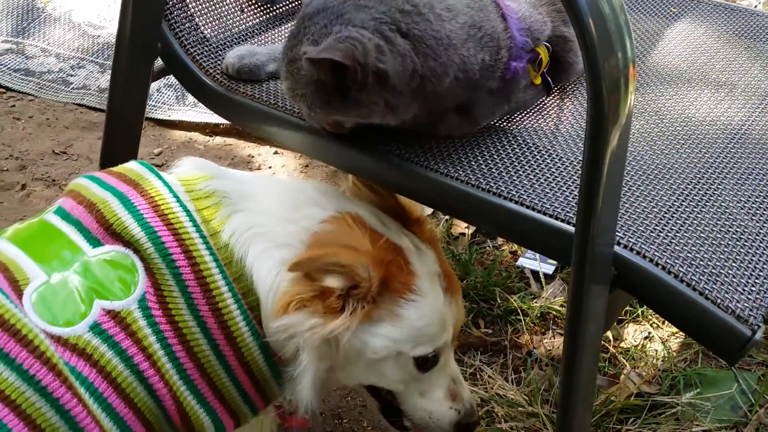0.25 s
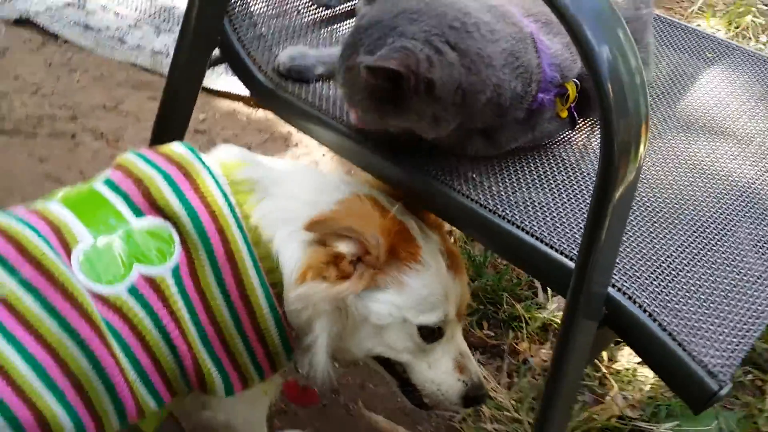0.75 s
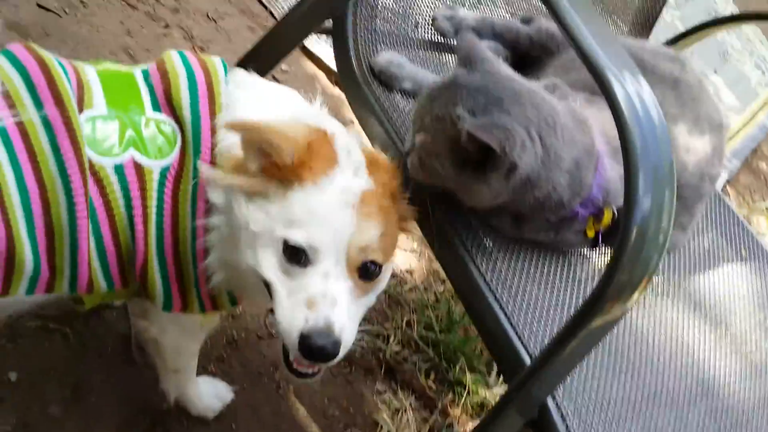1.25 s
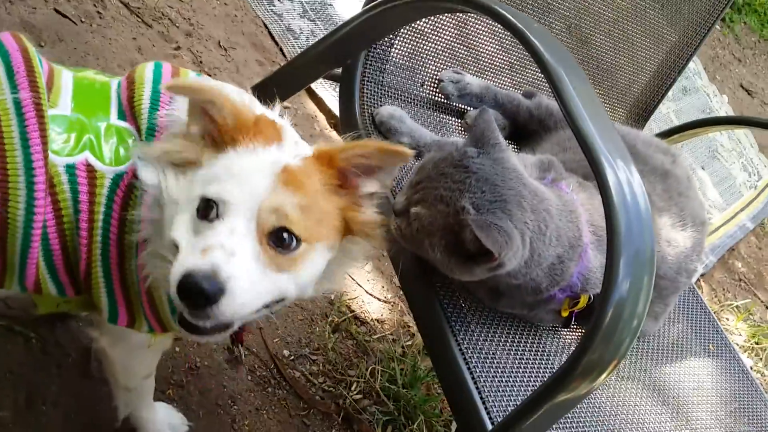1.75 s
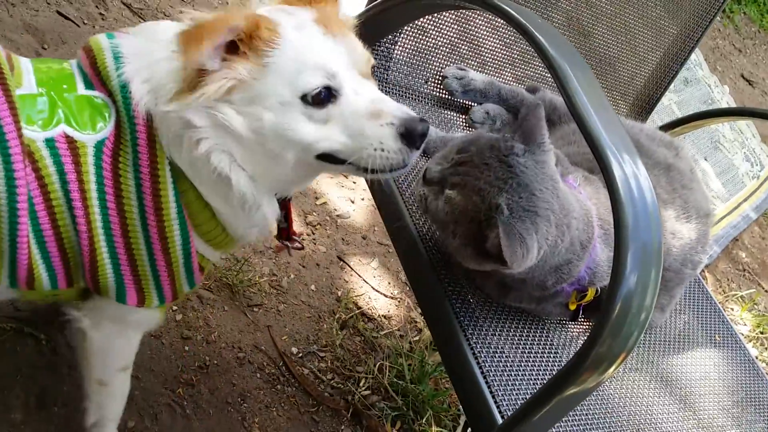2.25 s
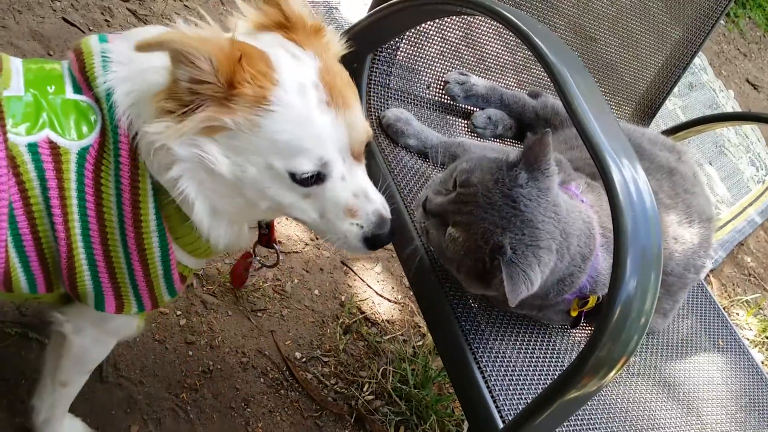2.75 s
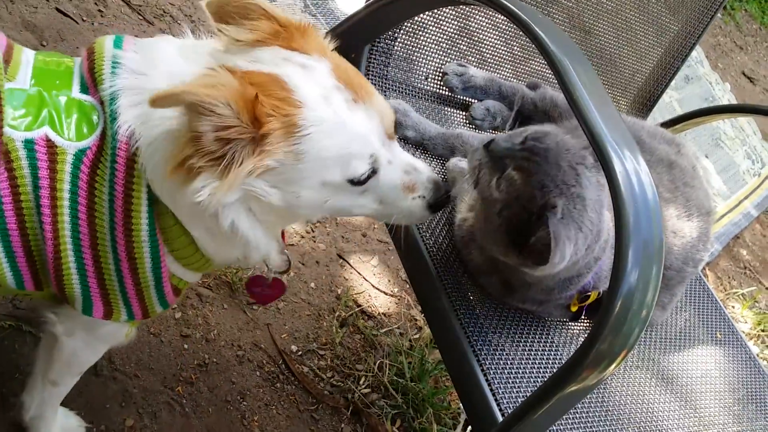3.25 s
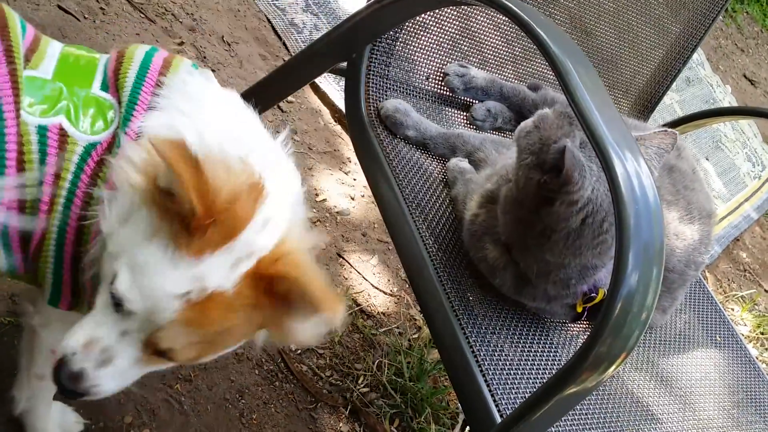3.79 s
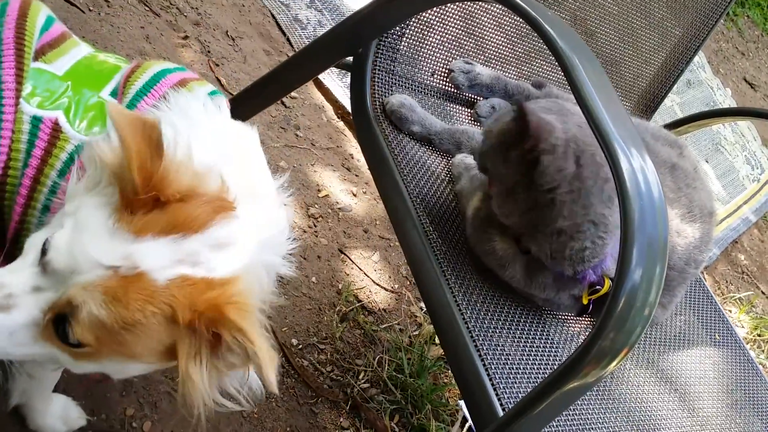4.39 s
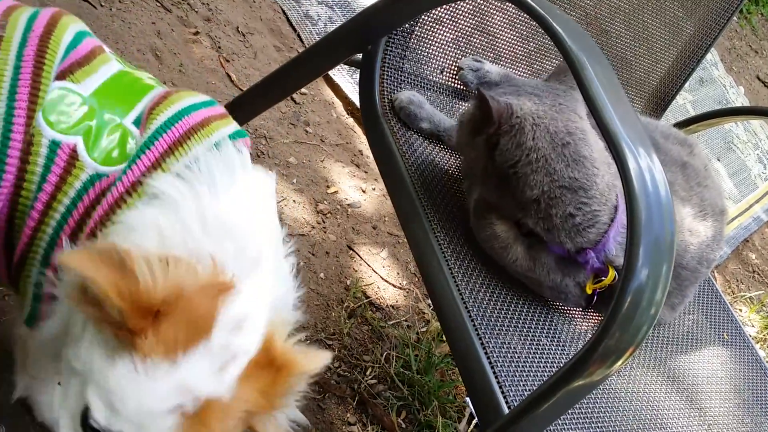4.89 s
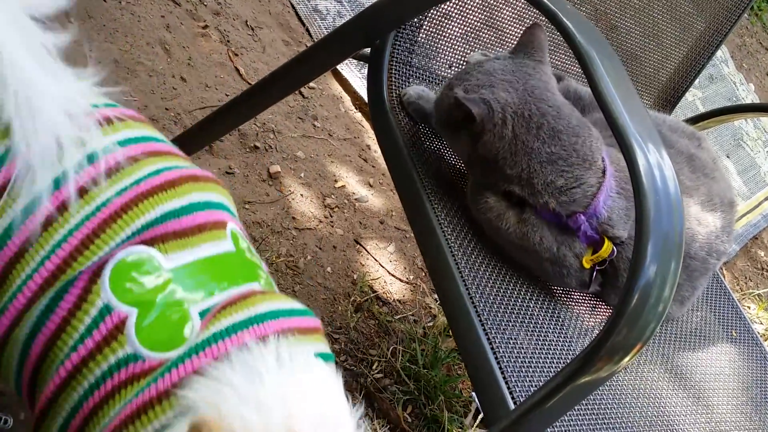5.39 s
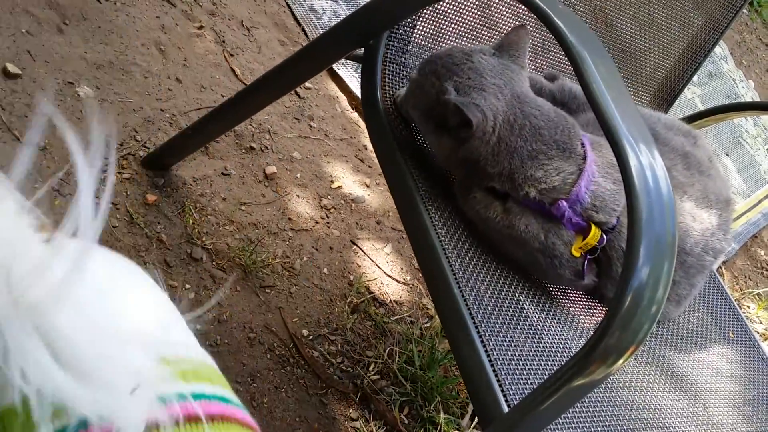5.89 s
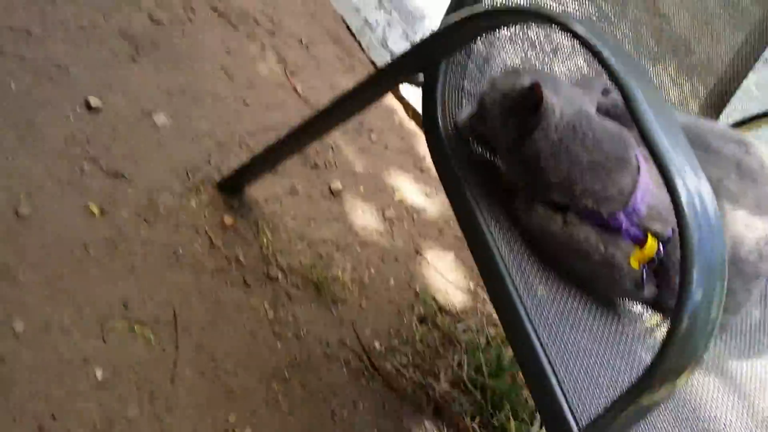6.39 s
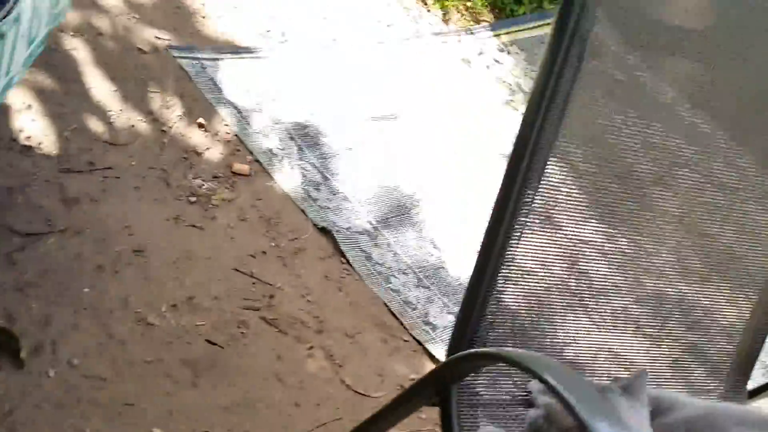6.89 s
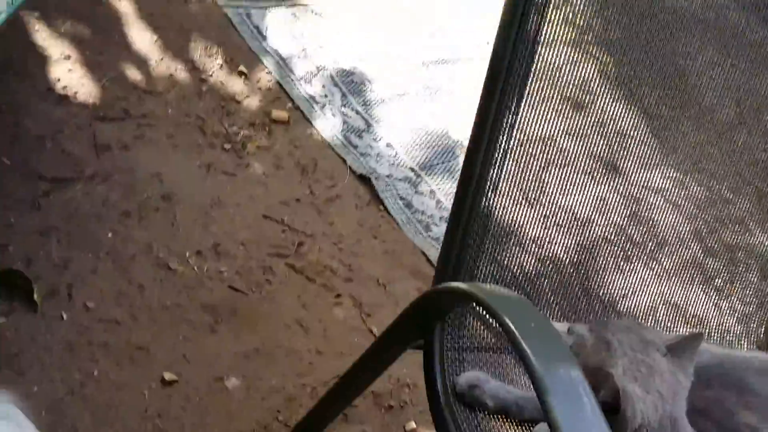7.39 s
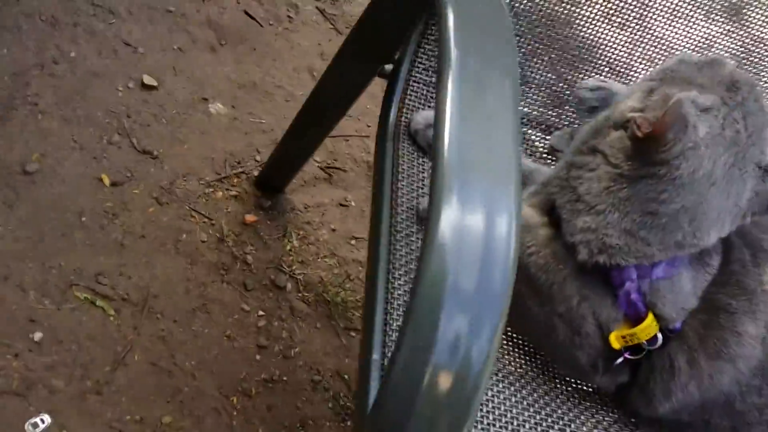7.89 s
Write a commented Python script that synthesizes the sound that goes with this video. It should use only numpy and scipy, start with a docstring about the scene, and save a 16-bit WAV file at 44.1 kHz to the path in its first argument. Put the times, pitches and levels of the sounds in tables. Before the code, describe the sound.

Close on the right, a dog's tags tick and jingle with gritty paw steps and coat rustle, over distant traffic wash and hiss.

```python
"""Metal collar tags clink, chatter and damp each other as a small dog moves about on dry soil, close on the right.
Each contact excites decaying tag modes, short clasp resonances and clicks; a few weak echoes follow.
Clumped noise grains make the paws and the rustling coat, and sharp clicks make snapping grit and twigs.
A far engine hums as gliding sines for about five seconds, over a slowly swelling wash of traffic in
shaped noise, a faint early whistle and a steady hiss."""
import sys
import numpy as np
from scipy import signal
from scipy.fft import rfft, irfft, next_fast_len
from scipy.io import wavfile

SR = 44100
rng = np.random.default_rng(int(sys.argv[2]) if len(sys.argv) > 2 else 0)


def persist_wave(psi):
    """Save psi, clipped to +-1, as 16-bit WAV."""
    counts = np.round(np.clip(psi, -1, 1) * 32767).astype(np.int16)
    wavfile.write(sys.argv[1], SR, np.atleast_2d(counts).T)


N = 359106
TIME = np.arange(N) / SR

# Contacts between the tags. Each row: start in seconds, relative strength in dB of the tag's first, second
# and third mode family, ring time in seconds to fall 60 dB, relative clack of the link ring in dB.
CLINKS = [(1.098, -30, -32, -43, 0.05, -34), (1.103, -52, -41, -62, 0.04, -40),
          (1.141, -41, -22, -48, 0.08, -35), (1.158, -31, -38, -40, 0.14, -46),
          (1.175, -28, -26.5, -42, 0.096, -33), (1.204, -52, -49, -63, 0.34, -62),
          (2.138, -51, -44, -33, 0.054, -36), (2.158, -57, -50.5, -63, 0.37, -55),
          (2.227, -45, -18, -27, 0.078, -32.5), (2.261, -51, -49, -48, 0.23, -39),
          (2.412, -53, -49, -60, 0.1, -44), (2.418, -45, -41.5, -54, 0.1, -50),
          (2.873, -59, -51, -72, 0.12, -61), (3.733, -52, -47, -42, 0.1, -51),
          (3.742, -35, -37, -35, 0.1, -44), (3.749, -42, -45, -48, 0.17, -39),
          (3.782, -40, -44, -46, 0.23, -38), (3.796, -42, -39, -50, 0.17, -35),
          (3.8232, -34, -22.5, -34, 0.14, -29), (3.837, -51, -30, -52, 0.044, -50),
          (4.021, -56.5, -62, -56, 0.28, -43), (4.102, -52, -66, -58, 0.18, -43.5),
          (4.491, -51, -60, -59, 0.3, -43), (4.545, -49, -64, -49, 0.2, -46),
          (4.556, -54, -52, -52, 0.12, -57), (5.438, -35.5, -45, -43, 0.12, -39),
          (5.592, -38, -56, -44, 0.1, -38), (5.638, -43, -64, -58, 0.07, -55),
          (6.182, -34.5, -40, -42, 0.091, -29), (6.24, -36, -62, -53, 0.19, -24),
          (6.263, -47, -49, -52, 0.11, -31), (6.298, -25, -28, -26, 0.1, -17),
          (6.305, -32, -40, -23, 0.25, -22), (6.316, -20, -34, -21, 0.1, -29),
          (6.326, -15, -39, -32, 0.1, -29), (6.333, -22, -33, -26, 0.11, -29),
          (6.363, -24, -13, -26, 0.1, -18), (6.372, -16, -17.5, -32, 0.083, -25),
          (6.385, -19, -22, -43, 0.25, -31), (6.397, -13.5, -20, -38, 0.11, -34),
          (6.407, -25, -27, -38, 0.1, -25), (6.415, -44, -44, -48, 0.1, -38),
          (6.424, -29, -26, -38, 0.08, -26), (6.432, -29, -36, -46, 0.16, -33),
          (6.447, -44, -36, -51, 0.2, -51), (6.536, -10.5, -22, -47, 0.1, -18),
          (6.5405, -14, -19, -48, 0.083, -26), (6.558, -6, -23, -29, 0.2, -19),
          (6.5655, -7, -30, -23, 0.1, -30), (6.568, -39, -47, -47, 0.2, -39),
          (6.588, -26, -54, -45, 0.25, -37), (6.606, -23, -41, -38, 0.11, -36),
          (6.6205, -27, -41, -42, 0.17, -21), (6.638, -23, -46, -37, 0.15, -34),
          (6.647, -16.5, -31, -31, 0.1, -28), (6.6655, -18, -27, -31, 0.1, -21),
          (6.671, -17.5, -32, -25.5, 0.1, -32), (6.714, -32, -48, -68, 0.06, -34),
          (6.78, -30, -46, -35, 0.08, -31), (6.794, -30, -39, -39, 0.1, -33),
          (6.803, -42, -52, -58, 0.2, -28), (6.869, -40, -63, -63, 0.13, -35),
          (6.952, -28.5, -52, -48, 0.18, -30), (6.966, -16.5, -33, -30, 0.1, -24),
          (6.992, -41, -42, -49, 0.15, -37), (7.042, -22.5, -37, -33, 0.2, -26),
          (7.058, -31, -45, -41, 0.1, -21), (7.065, -33, -55, -50, 0.09, -35),
          (7.107, -28, -50, -47, 0.1, -30), (7.113, -50, -51, -38, 0.077, -27),
          (7.144, -47, -41, -38, 0.062, -27), (7.423, -33, -50, -35, 0.14, -27),
          (7.444, -20, -28, -33, 0.1, -26), (7.45, -24, -28, -34, 0.1, -27),
          (7.461, -40, -35, -34, 0.081, -39), (7.532, -45, -48, -48, 0.05, -24),
          (7.543, -41, -49, -37, 0.085, -27), (7.572, -38, -45, -54, 0.1, -40),
          (7.673, -45, -57, -39, 0.1, -32), (7.684, -58, -44, -29, 0.05, -37),
          (7.695, -41, -36, -48, 0.095, -27), (7.85, -64, -42, -58, 0.32, -49),
          (7.933, -62, -49, -36, 0.05, -32), (8.064, -42, -53, -46, 0.13, -34)]


def from_db(db):
    """Decibels to amplitude gain."""
    return 10 ** (np.asarray(db) / 20)


def rms_one(x):
    """Scale to rms 1."""
    return x / np.sqrt(np.mean(x ** 2) + 1e-20)


def in_time(rows):
    """Draw each column of a breakpoint curve at every sample."""
    s, *columns = np.transpose(rows)
    return [np.interp(TIME, s, c) for c in columns]


def at_hz(points, hz):
    """Read a curve on a log-frequency axis."""
    point_hz, values = np.array(points).T
    return np.interp(np.log(hz), np.log(point_hz), values)


def drift(rate_hz):
    """Slow random wander with rms 1: low-passed noise, drawn at one point per 40 samples."""
    step = 40
    r = np.exp(-2 * np.pi * rate_hz * step / SR)
    noise = rng.standard_normal(N // step + 2002)
    slow = signal.lfilter([1], [1, -2 * r, r * r], noise)[2000:]  # skip the filter's settling
    return np.interp(np.arange(N) / step, np.arange(len(slow)), rms_one(slow))


def coloured(x, spectrum):
    """Filter a signal through a smooth spectral curve and scale it to rms 1."""
    size = next_fast_len(N)
    hz = np.maximum(np.fft.rfftfreq(size, 1 / SR), 1)
    shaped = rfft(x, size) * from_db(at_hz(spectrum, hz))
    return rms_one(irfft(shaped, size)[..., :N])


def air_noise(spectrum):
    """Far sound at two microphones: alike in the bass, less related and more one-sided in the treble."""
    # Each row: frequency in Hz, left minus right level in dB.
    air_balance = [(60, -3.5), (400, -5), (700, -5), (1290, -10.5), (2380, -21), (4400, -16.5),
                   (9000, -13.5)]
    # Each row: frequency in Hz, left-right correlation from 0 to 1.
    air_likeness = [(60, 0.9), (130, 0.94), (290, 0.95), (640, 0.68), (1400, 0), (3100, 0.38), (7000, 0)]
    size = next_fast_len(N)
    hz = np.maximum(np.fft.rfftfreq(size, 1 / SR), 1)
    mid, side = rfft(rng.standard_normal((2, size)))
    alike = np.clip(at_hz(air_likeness, hz), -1, 1)
    signs = np.array([[1], [-1]])  # left, right
    pair = np.sqrt(1 + alike) * mid + np.sqrt(1 - alike) * side * signs
    gain = from_db(at_hz(spectrum, hz) + signs * at_hz(air_balance, hz) / 2)
    return rms_one(irfft(pair * gain, size)[:, :N])


def grains(per_s, spread_db):
    """Random clicks of uneven size and either sign, independent in two channels, rms 1."""
    loudness_db = spread_db * np.minimum(rng.exponential(1, (2, N)), 4)
    sizes = from_db(loudness_db) * rng.choice([-1, 1], (2, N))
    return rms_one(sizes * (rng.random((2, N)) < per_s / SR))


def swells(rows):
    """Sum of bell-shaped rises and falls, one for each stroke."""
    bells = 0
    for s, spread_s, db in rows:
        bells = bells + from_db(db) * np.exp(-.5 * np.minimum(((TIME - s) / spread_s) ** 2, 100))
    return bells


def resonance(x, hz, width_hz):
    """Two-pole resonance with gain 1 at its peak."""
    r = np.exp(-np.pi * width_hz / SR)
    top = np.array([1, 0, -1]) * (1 - r * r) / 2
    return signal.lfilter(top, [1, -2 * r * np.cos(2 * np.pi * hz / SR), r * r], x + 1e-18)


def near(x, left_db):
    """Place a near source: the right channel is unchanged and the left is offset in level."""
    return x * from_db([[left_db], [0]])


def tag_ring(detune_hz=10, damp_s=0.00034, attack_s=0.00081, nudge_rad=1.0,
             free_db=-29, free_t60=0.18, waver_db=2.5):
    """Each contact sets the tag's modes ringing until the next stops them; a faint free ring lasts longer."""
    # The three mode families, each with its weaker companions. Each row: frequency in Hz, relative level in dB.
    tag_modes = [
        [(7252, -1.74), (7250, -28), (7420, -17), (7940, -27)],
        [(9812, 0), (10221, -22), (10434, -17)],
        [(11705, -0.5), (14100, -24)],
    ]
    out, t = np.zeros(N + SR), np.arange(SR // 3) / SR
    starts = [row[0] for row in CLINKS]
    for (s, *strengths_db, t60, _), until in zip(CLINKS, starts[1:] + [TIME[-1]]):
        stopped = np.exp(-np.maximum(t - (until - s), 0) / damp_s)
        held_ring = from_db(-60 * t / t60) * stopped
        free_ring = from_db(free_db - 60 * t / free_t60)
        fade = (1 - np.exp(-t / attack_s)) * (held_ring + free_ring)
        at = round(s * SR)
        for strength_db, family in zip(strengths_db, tag_modes):
            for hz, db in family:
                # a blow only nudges the phase of a mode that already swings; its load shifts the pitch a little
                off, kick = rng.standard_normal(2)
                cycles = hz * (t + at / SR) + detune_hz * off * t
                swing = np.sin(2 * np.pi * cycles + nudge_rad * kick)
                out[at:at + len(t)] += from_db(strength_db + db) * fade * swing
    return out[:N] * from_db(waver_db * drift(51))


def pings(notes, attack_s=0.00079):
    """Pure, dying notes of struck metal that ring on through later contacts."""
    out, t = np.zeros(N + SR), np.arange(SR // 2) / SR
    for s, hz, db, t60 in notes:
        at = round(s * SR)
        fade = from_db(db - 60 * t / t60) * (1 - np.exp(-t / attack_s))
        out[at:at + len(t)] += fade * np.sin(2 * np.pi * hz * t)
    return out[:N]


def clasp_clack(ringing, level_db=21, knock_db=-4, chatter_db=-7.5, chatter_per_s=3200, chatter_s=0.0043,
                closing_s=0.00074, buzz_db=-22, buzz_clump_db=3.5, buzz_s=0.036, colour_db=3.0, radiate_hz=6400):
    """Each contact knocks the link ring, which skids and rebounds in tiny clicks and buzzes on the ringing tag."""
    # Short resonances of link ring and clasp. Each row: frequency in Hz, width in Hz, relative level in dB.
    clasp = [(4330, 570, 5.5), (7430, 110, -1), (7340, 290, 6), (8030, 200, 5.5), (8510, 260, 10.5),
             (8860, 800, 3), (10280, 240, 4.5), (10470, 450, 1.5), (11200, 1000, -7), (14100, 1000, -13)]
    knocks = np.zeros(N)
    for s, *_, clack_db in CLINKS:
        knocks[round(s * SR)] = from_db(clack_db)
    skid = signal.lfilter([1], [1, -np.exp(-1 / (chatter_s * SR))], knocks + 1e-18)
    closing = np.exp(-1 / (closing_s * SR))  # the parts graze before they meet fully
    skid = signal.lfilter([1 - closing], [1, -closing], skid)

    keep = np.exp(-1 / (buzz_s * SR))  # the buzz follows the loudness of the tag
    loudness = signal.lfilter([1 - keep], [1, -keep], np.abs(ringing) + 1e-18)
    buzz = loudness * from_db(buzz_db + buzz_clump_db * drift(70))

    touches = (rng.random(N) < chatter_per_s / SR) * rng.uniform(0.76, 1, N) * rng.choice([-1, 1], N)
    clicks = from_db(knock_db) * knocks + (from_db(chatter_db) * skid + buzz) * touches
    rings = 0
    for k, (hz, width_hz, db) in enumerate(clasp):
        # the point of contact moves, so every blow favours other resonances
        favoured = clicks * from_db(db + colour_db * drift(42))
        rings = rings + (-1) ** k * resonance(favoured, hz, width_hz)
    # so small a part radiates almost nothing at longer wavelengths
    radiation = signal.butter(3, radiate_hz, "high", fs=SR, output="sos")
    return from_db(level_db) * signal.sosfilt(radiation, rings)


def clasp_snaps():
    """The clasp takes up its slack in very short, broad bursts of grating, dry and without a note."""
    # Each row: start in seconds, relative level in dB, decay constant in seconds.
    snaps = [(1.1, -39, .003), (1.14, -35, .003), (1.176, -32, .003), (3.745, -39, .008),
             (3.783, -41, .004), (4.332, -44, .001), (5.241, -46, .001), (6.536, -26, .0008),
             (7.058, -23.5, .003), (7.108, -26, .002), (7.449, -24, .003), (7.533, -22.5, .0009),
             (7.573, -34, .006), (7.614, -28, .0008), (7.734, -31, .0008), (7.756, -34, .0008)]
    # Each row: frequency in Hz, relative level in dB.
    snap_colour = [(2500, -29), (4800, -4), (6200, -3), (8700, 6.5), (14500, -3)]
    bursts, t = np.zeros(N + SR), np.arange(SR // 10) / SR
    for s, db, decay_s in snaps:
        at = round(s * SR)
        bursts[at:at + len(t)] += from_db(db) * np.exp(-t / decay_s)
    return bursts[:N] * coloured(rng.standard_normal(N), snap_colour)


def contact_clicks(level_db=-2, rebound_db=-1, rebound_s=0.0012, low_hz=2300):
    """Metal meeting metal: a bare, crisp click and one quick rebound."""
    clicks = np.zeros(N)
    for (s, *_, clack_db), late in zip(CLINKS, rng.uniform(0.48, 1.4, len(CLINKS))):
        clicks[round(s * SR)] += from_db(clack_db)
        clicks[round((s + late * rebound_s) * SR)] += from_db(clack_db + rebound_db)
    band = signal.butter(2, [low_hz, 13500], "band", fs=SR, output="sos")
    return from_db(level_db) * signal.sosfilt(band, clicks + 1e-18)


def garden_echoes(x, last_s=0.014, count=24):
    """A few weak reflections off the ground and a chair, with other delays on each side."""
    out = np.zeros((2, N))
    for k, delay in enumerate(rng.uniform(0.01, last_s, count)):
        lag = max(round(delay * SR), 1)
        out[k % 2, lag:] += x[:-lag] * np.exp(-2 * delay / last_s) * (-1) ** (k // 2)
    return out / 2


def collar(echo_db=-29):
    """The tags, link ring and clasp, close on the right, with their echoes on both sides."""
    # Blows that flex a tag and sound its lower notes. Each row: start in seconds, note in Hz,
    # relative level in dB, time in seconds to fall 60 dB.
    bends = [(1.158, 4110, -54, .06), (1.175, 3700, -55, .06), (1.178, 4425, -53, .25),
             (1.975, 3970, -49, .04), (5.585, 4150, -51, .1), (3.785, 4090, -47, 0.14),
             (3.82, 4080, -41, 0.054), (6.302, 4140, -28.5, 0.08), (6.363, 4100, -24, 0.062),
             (6.364, 4425, -36, 0.24), (6.425, 4370, -45, 0.59), (6.536, 4470, -39, .15),
             (6.558, 4380, -37, .12), (6.59, 4200, -37, 0.23), (6.965, 4080, -33, .07),
             (6.967, 4425, -45, .25), (7.044, 4110, -37, 0.076), (7.445, 4425, -43, .06)]
    # Blows that catch the link ring free; its note depends on where it is held. Each row: start in seconds,
    # note in Hz, relative level in dB, time in seconds to fall 60 dB.
    ring_notes = [(1.099, 10250, -33, .04), (1.175, 10206, -34, .03), (6.183, 10540, -33, 0.032),
                  (6.2975, 7520, -9, .02), (6.298, 8100, -8, .02), (6.315, 7988, -24, .06),
                  (6.408, 7700, -13, 0.027), (6.424, 7600, -17, .035), (6.425, 10220, -25, .04),
                  (6.5655, 7500, -11, 0.022), (6.62, 8074, -17, .025), (6.666, 7800, -10, .022),
                  (6.674, 8240, -19, 0.034), (7.042, 10422, -23.5, .06), (7.107, 10600, -31, .05),
                  (7.144, 8900, -30, .03), (7.532, 8613, -18, 0.018), (7.695, 10766, -23, 0.038)]
    ringing = tag_ring()
    metal = ringing + pings(bends) + pings(ring_notes)
    metal = metal + clasp_clack(ringing) + clasp_snaps() + contact_clicks()
    echoes = from_db(echo_db) * garden_echoes(metal) * from_db([[-1], [1]])
    return near(metal, left_db=-32.0) + echoes


def paws(level_db=-2.5, clump_db=0.5, grit_db=-4):
    """Soil crunches in coarse, clumped grains under each scuff, and a few larger crumbs grind among them."""
    # Each row: middle in seconds, spread in seconds, relative level in dB.
    scuffs = [(5.31, 0.025, -39.5), (5.61, 0.027, -46), (6.09, 0.019, -35.5), (6.21, 0.039, -39),
              (6.367, 0.021, -31), (6.605, 0.024, -26.5), (6.975, 0.014, -37), (7.26, 0.031, -49),
              (7.503, 0.03, -32), (7.83, 0.019, -44.5), (8.0, 0.023, -37.5)]
    # Spectra of soil and grit. Each row: frequency in Hz, relative level in dB.
    scuff_colour = [(300, 2), (520, -8), (780, 2), (1150, -7), (1700, 1.5), (2350, 10.5), (3300, 3.5),
                    (4500, -5.5), (6000, -16), (9000, -6.5), (15000, -56)]
    grit_colour = [(300, 0), (700, -6), (1800, 0.5), (4000, 0), (7000, -23), (15000, -35)]
    push = from_db(level_db + clump_db * drift(48)) * swells(scuffs)
    soil = coloured(grains(per_s=2500, spread_db=2.0), scuff_colour)
    grit = coloured(grains(per_s=330, spread_db=3.0), grit_colour)
    return near(push * (soil + from_db(grit_db) * grit), left_db=-25)


def treads(clump_db=2):
    """The dog's weight lands with a dull, hollow push that reaches both microphones."""
    # Each row: middle in seconds, spread in seconds, relative level in dB.
    heavy_steps = [(6.372, 0.014, -42), (6.605, 0.031, -41), (6.98, 0.022, -44), (7.622, .013, -46)]
    # Each row: frequency in Hz, relative level in dB.
    tread_colour = [(250, -13), (560, -15), (730, 10), (1000, 0), (2000, -22), (4000, -29)]
    push = from_db(clump_db * drift(60)) * swells(heavy_steps)
    return near(push * coloured(grains(per_s=1200, spread_db=3.0), tread_colour), left_db=-1)


def coat(level_db=-2, brush_db=-1, flutter_db=2):
    """Fur, knitted coat and dry grass rub in fine bright grains."""
    # Rustling as the dog moves. Each row: time in seconds, relative level in dB.
    rustle = [(0, -76.5), (.9, -58.5), (1.35, -60), (1.5, -65.5), (3.4, -69), (4.8, -65.5), (5.4, -58),
              (6.9, -56.5), (7.35, -43.5), (8.14, -47)]
    # Strokes of collar and coat on fur. Each row: middle in seconds, spread in seconds, relative level in dB.
    brushes = [(.855, 0.032, -61), (1.725, 0.009, -55), (1.875, 0.0085, -53), (2.08, 0.013, -53),
               (3.62, 0.055, -52.5), (3.71, 0.051, -53), (3.9, 0.42, -72), (5.07, 0.011, -57),
               (6.4, 0.069, -37.5), (6.76, 0.064, -51), (7.06, 0.036, -55), (7.52, 0.046, -52),
               (7.72, 0.019, -49), (7.99, 0.026, -48)]
    # Each row: frequency in Hz, relative level in dB.
    rustle_colour = [(2000, -10), (4000, -4), (6300, -9), (8300, 2), (10000, -1), (12000, -7.5),
                     (14500, -18)]
    rubbing = from_db(in_time(rustle)[0] + level_db) + from_db(brush_db) * swells(brushes)
    fibres = coloured(grains(per_s=3200, spread_db=1.5), rustle_colour)
    return near(rubbing * from_db(flutter_db * drift(24)) * fibres, left_db=-33)


def ticks(decay_s=0.0068, crack_hz=4000):
    """Grit and twigs snap: a sharp crack, louder on the left, and a very short, bright crumble on the right."""
    # Each row: start in seconds, relative crack level in dB, relative crumble level in dB.
    snapping = [(0.9709, -30.5, -49), (5.945, -48, -47), (7.302, -42, -33.5), (8.019, -39, -33.5)]
    cracks, crumbs = np.zeros(N), np.zeros(N)
    for s, crack_db, crumble_db in snapping:
        at = round(s * SR)
        cracks[at], crumbs[at] = from_db(crack_db), from_db(crumble_db)
    band = signal.butter(2, [250, crack_hz], "band", fs=SR, output="sos")
    crack = signal.sosfilt(band, cracks + 1e-18)
    fade = signal.lfilter([1], [1, -np.exp(-1 / (decay_s * SR))], crumbs + 1e-18)
    crumble_colour = [(2000, 3), (6300, 2.0), (9000, -2), (15000, -9)]  # Hz, relative dB
    crumble = fade * coloured(rng.standard_normal((2, N)), crumble_colour)
    return near(crack, left_db=19.5) + near(crumble, left_db=-27)


def engine(idle_hz=83.26, extra_hz=3.5, settle_s=1.1, second_db=-25, third_db=-35, waver_db=-0.34):
    """Only the firing tone of a far engine carries, with weak overtones; it starts fast and settles to its idle."""
    # Each row: time in seconds, relative level in dB.
    loudness = [(0, -61), (1.0, -43), (1.37, -42.5), (1.5, -33.5), (1.7, -31), (1.88, -34.5), (2.35, -31.5),
                (2.76, -35.5), (2.95, -43), (3.55, -32), (4.07, -38), (4.88, -36), (5.15, -50), (5.6, -100)]
    db, = in_time(loudness)
    hz = idle_hz + extra_hz * np.exp(-TIME / settle_s)
    phase = 2 * np.pi * np.cumsum(hz) / SR
    tone = np.sin(phase) + from_db(second_db) * np.sin(2 * phase) + from_db(third_db) * np.sin(3 * phase)
    return np.sqrt(2) * tone * from_db(db + waver_db * drift(13)) * from_db([[-2.4], [1.9]])


def traffic(rumble_db=2, wash_db=4, flutter_db=0.88):
    """Low rumble and tyre wash from a distant road; late on, the wash sinks in pitch, then partly returns."""
    # Each row: time in seconds, relative rumble level in dB, relative tyre wash level in dB.
    road = [(0, -54, -64), (1.88, -47, -54), (3.06, -48.5, -52.5), (3.81, -47, -51.5), (4.92, -47, -47),
            (5.9, -48, -45.5), (8.14, -45, -43.5)]
    # Spectra of the rumble, the wash and the sunken wash. Each row: frequency in Hz, relative level in dB.
    rumble_colour = [(20, -28), (40, -9.5), (65, 1.5), (110, 7), (160, -2), (260, -9), (400, -17),
                     (700, -16), (1500, -55)]
    wash_colour = [(150, 6), (280, 5.5), (450, 0), (750, 2), (1030, 5.5), (1400, 0), (2000, -4),
                   (2500, -11), (3200, -18.5), (4500, -25), (6000, -32), (9000, -23.5), (15000, -90)]
    late_wash_colour = [(150, 5.5), (280, 6.5), (480, -1.5), (720, 3), (900, 3), (1400, -1.5), (2000, -6.5),
                        (2500, -9.5), (3200, -14), (4500, -25), (6000, -29), (9000, -44), (15000, -51)]
    rumble, wash = in_time(road)
    sunk = np.interp(TIME, [6.1, 6.4, 7.35, 7.9], [0, 0.99, 0.95, 0.51])  # power share of the sunken wash
    tyres = np.sqrt(1 - sunk) * air_noise(wash_colour) + np.sqrt(sunk) * air_noise(late_wash_colour)
    low = from_db(rumble + rumble_db) * air_noise(rumble_colour)
    return low + from_db(wash + wash_db + flutter_db * drift(5.4)) * tyres


def whistle(hz=7312):
    """A thin, faint, far sine tone that swells and fades a few times."""
    # Each row: middle in seconds, spread in seconds, relative level in dB.
    whistle_swells = [(.21, .045, -76), (.44, 0.038, -73), (.72, .08, -81)]
    tone = np.sqrt(2) * np.sin(2 * np.pi * hz * TIME)
    return swells(whistle_swells) * tone * from_db([[-5], [3]])


def hiss(level_db=-58.5):
    """Faint even noise, independent in each channel, that rises by 5 dB over the first 1.2 seconds."""
    # Each row: frequency in Hz, relative level in dB.
    hiss_colour = [(1000, 6), (4000, -8), (6300, -12), (9000, -12), (12000, -10.5), (15000, -12.5)]
    rise_db = np.interp(TIME, [0, 1.2], [-5, 0])
    return from_db(level_db + rise_db) * coloured(rng.standard_normal((2, N)), hiss_colour)


def scene():
    """The dog, the far engine and road, the whistle and the hiss."""
    dog = collar() + paws() + treads() + coat() + ticks()
    return dog + engine() + traffic() + whistle() + hiss()


def record(dry, top=0.6, cutoff_hz=14800):
    """Peaks are rounded smoothly towards a ceiling and a steep low-pass cuts the top."""
    rounded = top * np.tanh(dry / top)
    return signal.sosfilt(signal.ellip(10, .3, 80, cutoff_hz, fs=SR, output="sos"), rounded)


dry = scene()
out = record(dry)
persist_wave(out)
```